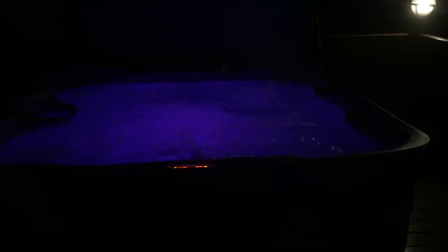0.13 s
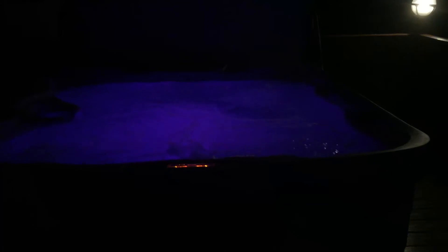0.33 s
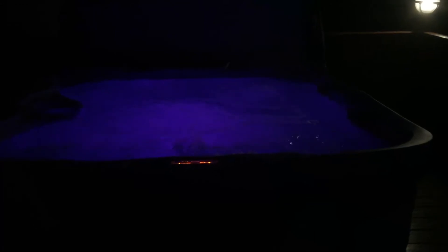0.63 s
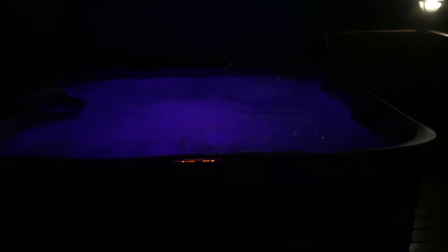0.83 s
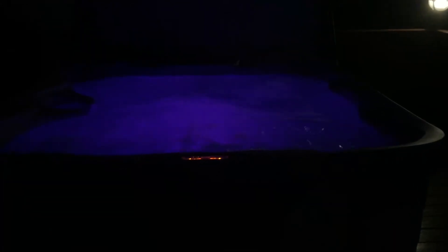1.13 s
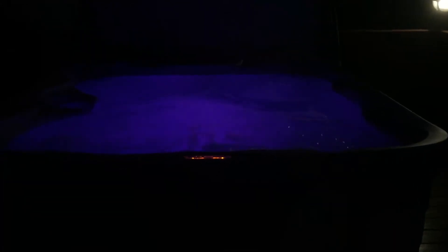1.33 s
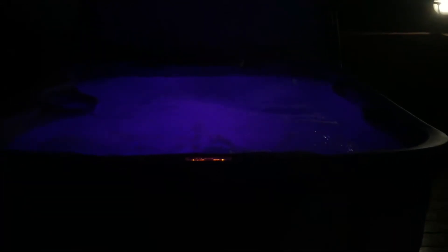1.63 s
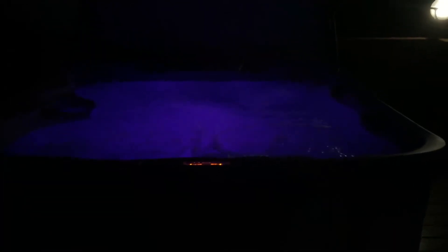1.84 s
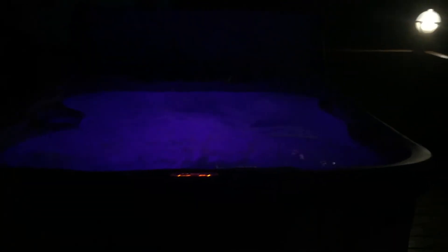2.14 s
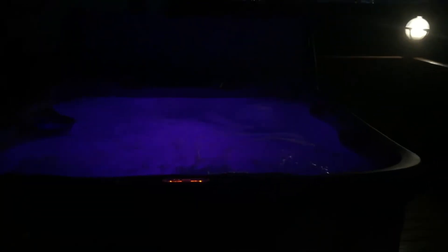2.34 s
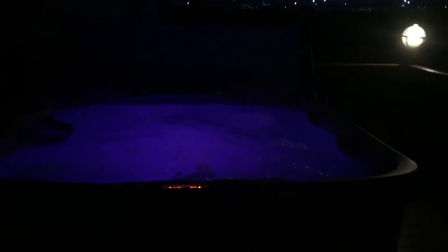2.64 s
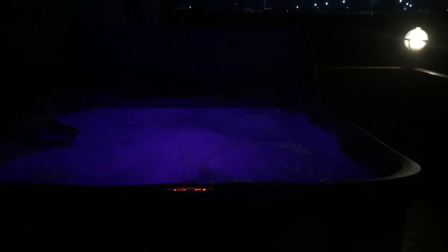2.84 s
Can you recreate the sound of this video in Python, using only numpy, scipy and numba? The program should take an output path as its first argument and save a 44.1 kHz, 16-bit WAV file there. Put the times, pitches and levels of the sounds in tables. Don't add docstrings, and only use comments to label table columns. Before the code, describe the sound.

Hot tub jets rush and bubble steadily over a low pump hum, with small droplet ticks

```python
import sys
import numpy as np
from scipy import signal
from scipy.fft import rfft, irfft
from scipy.io import wavfile
from scipy.ndimage import uniform_filter1d
from numba import njit

SR = 44100
rng = np.random.default_rng(int(sys.argv[2]) if len(sys.argv) > 2 else 0)


def transcribe(u):
    v = np.clip(np.atleast_2d(u).T, -1, 1)
    q = np.round(v * 32767).astype(np.int16)
    wavfile.write(sys.argv[1], SR, q)


def ratio_of_db(decibels):
    return 10 ** (np.asarray(decibels, float) / 20)


N = 132300


def level(x, db):
    return x * ratio_of_db(db) / np.sqrt(np.mean(x ** 2))


@njit
def svf(x, hz, width):
    y, b, l = np.empty(len(x)), 0., 0.
    g, k = np.tan(np.pi * hz / SR), width / hz
    for i in range(len(x)):
        v = (b + g * (x[i] - l)) / (1 + g * (g + k))
        b, l, y[i] = 2 * v - b, l + 2 * g * v, k * v
    return y


@njit
def rings(at, hz, cycles, size, glide):
    y = np.zeros(N)
    for e in range(len(at)):
        start = int(at[e])
        length = cycles[e] * SR / hz[e]
        phase = 0.
        for i in range(min(int(length), N - start)):
            phase += 2 * np.pi * hz[e] * (1 + glide * i / length) / SR
            fade = 7 * i / length
            y[start + i] += size[e] * fade * np.exp(1 - fade) * np.sin(phase)
    return y


def walk(rate):
    hold = int(SR / rate)
    steps = np.repeat(rng.standard_normal(N // hold + 1), hold)
    return 1.28 * uniform_filter1d(uniform_filter1d(steps, hold), hold)[:N]


HUM_HZ = 100.165
# multiple of the hum pitch, rms level in dB.
HUM = [
    (1, -42.5),
    (2, -41.2),
    (3, -40.3),
    (4, -56),
    (5.794, -56),
]
# time in seconds, rms level in dB.
THROB = [(0.13, -56), (0.18, -39), (0.33, -47), (0.37, -54), (0.5, -40.5), (1.04, -43), (1.1, -37.5),
         (1.23, -49.5), (1.38, -34), (1.42, -41), (2.3, -42), (2.38, -44), (2.43, -44.5), (2.56, -42),
         (2.64, -48.5), (2.87, -38), (2.93, -50), (3.0, -49)]


def hum():
    t = np.arange(N) / SR
    throb_db = np.interp(t, *np.array(THROB).T)
    throb_db = throb_db - throb_db.mean()
    out = np.zeros(N)
    for multiple, db in HUM:
        line_db = db + 1.7 * walk(24)
        if multiple == 1:
            line_db = line_db + throb_db
        phase = 2 * np.pi * multiple * HUM_HZ * t + 1.3 * multiple ** 2
        out += np.sqrt(2) * ratio_of_db(line_db) * np.cos(phase)
    return out


# pitch in Hz, width in Hz, rms level in dB.
WHINES = [
    (58, 24, -49),
    (100, 14, -56),
    (339, 7, -52),
    (951, 40, -58),
    (1254, 4, -62.5),
    (2600, 70, -55.5),
    (5900, 500, -62),
]


def whines():
    out = np.zeros(N)
    for hz, width, db in WHINES:
        noise = rng.standard_normal(2 * N)
        tone = svf(noise, 1. * hz, 0.94 * width)
        tone = svf(tone, 1. * hz, 0.94 * width)
        out += level(tone[N:], db)
    return out


# frequency in Hz, strength in dB per Hz.
RUSH = [
    (38, -29),
    (60, -3.5),
    (300, -5),
    (450, -9.5),
    (1250, -17.5),
    (2600, -16),
    (3200, -23),
    (12000, -33),
]
RUSH_DB = -37.5


def rush_db(hz):
    table_hz, table_db = np.array(RUSH).T
    return np.interp(np.log(hz), np.log(table_hz), table_db)


def jets():
    hz = np.maximum(np.arange(N // 2 + 1) * SR / N, 1)
    spectrum = rfft(rng.standard_normal(N)) * ratio_of_db(rush_db(hz))
    swell_db = .2 * walk(0.47) + 0.78 * walk(40.67)
    out = np.zeros(N)
    for octave in np.arange(4, 14.5, 1 / 3):
        distance = np.clip(3 * (np.log2(hz) - octave), -1, 1)
        band = irfft(spectrum * np.cos(np.pi / 2 * distance) ** 2, N)
        out += band * ratio_of_db(swell_db + 1.2 * walk(9.04))
    return level(out, RUSH_DB)


def bursts(count, lo_hz, hi_hz, cycles, spread_db, glide):
    when, pitch, loudness, ring = rng.random((count, 4)).T
    hz = lo_hz * (hi_hz / lo_hz) ** pitch
    size = ratio_of_db(rush_db(hz) - spread_db * np.log(1 - .955 * loudness)) * hz / 1000
    return rings(when * N, hz, cycles * (.5 + ring), size / np.sqrt(cycles), 1. * glide)


def bubbles():
    return ratio_of_db(RUSH_DB + 5.5) * bursts(4500, 299.6, 12820, cycles=30, spread_db=5, glide=.2)


def fizz():
    return ratio_of_db(RUSH_DB + 11.5) * bursts(1500, 3500, 13300, cycles=5, spread_db=2.4, glide=0)


def strike(events):
    s, db, hz, cycles = np.array(events).T.copy()
    return -rings(s * SR, hz, cycles, ratio_of_db(db), 0.022)


# start in seconds, peak in dB, pitch in Hz, cycles of ring.
DROPS = [(.537, -35, 13400, 30), (.748, -36, 11700, 6), (.792, -38, 12400, 14), (1.1035, -35, 5500, 6),
         (1.139, -41, 11000, 40), (1.1775, -38, 7650, 12), (1.283, -36, 8700, 25), (1.381, -40, 11000, 24),
         (1.413, -41, 7900, 14), (1.457, -35, 12400, 10), (1.5, -33, 4500, 4), (1.5395, -34, 3800, 6),
         (1.7045, -35, 13400, 30), (1.7925, -31, 8000, 4), (1.7965, -32, 5000, 6), (1.8015, -35, 9000, 4),
         (2.104, -33, 11000, 5), (2.202, -38, 12400, 20), (2.259, -40, 12000, 4), (2.478, -37, 13800, 10),
         (2.56, -38, 9900, 10), (2.601, -34, 12600, 26), (2.747, -35, 2670, 16), (2.912, -40, 12700, 20),
         (2.939, -32, 4180, 10), (2.939, -38, 5600, 9), (2.8625, -41, 6100, 12), (2.8625, -43, 8400, 12),
         (2.8668, -40, 6600, 12), (2.929, -44, 4600, 12), (2.948, -39, 4300, 16), (1.648, -40, 3630, 20),
         (1.383, -40, 4100, 16), (.224, -40, 8900, 20), (.2255, -42, 10100, 16), (.2965, -37, 3930, 18),
         (0.401, -39, 6450, 18), (.413, -41, 7000, 16), (.468, -41, 10700, 24), (.492, -42, 14300, 16),
         (.52, -43, 14300, 16), (.794, -44, 6800, 14), (1.7945, -41, 13000, 14), (1.938, -43, 4580, 16),
         (2.171, -42, 11750, 20), (2.291, -39, 15000, 20), (2.402, -45, 9200, 16), (2.485, -38.5, 3900, 16),
         (2.916, -40, 7650, 18), (2.837, -41, 12000, 10), (2.936, -38, 12500, 8), (2.824, -42, 8200, 12)]


def droplets():
    return strike(DROPS)


# start in seconds, peak in dB, pitch in Hz, cycles of ring.
GURGLES = [(.445, -40, 2100, 45), (.46, -40, 1850, 50), (.678, -42, 1150, 25), (.88, -38, 1300, 30),
           (.958, -43, 1870, 40), (1.735, -44, 2100, 30), (2.055, -44, 1900, 30), (2.105, -40, 1700, 35),
           (2.395, -39, 1050, 25), (.525, -40, 2300, 25), (1.29, -37, 54, 12), (1.888, -31, 140, 4),
           (2.62, -39, 54, 10), (.388, -43, 1900, 35), (.555, -43, 1270, 28), (1.165, -43, 1180, 26),
           (1.183, -43, 1650, 30), (1.239, -43, 2330, 36), (1.338, -41, 970, 24), (1.697, -40, 715, 20),
           (1.744, -44, 2290, 34), (1.935, -43, 1560, 30), (2.13, -42, 925, 22), (2.277, -42, 2590, 45),
           (2.341, -41, 715, 20), (2.566, -41, 885, 24), (2.597, -42, 1820, 34), (2.654, -40, 760, 20),
           (2.002, -43, 2590, 45), (.748, -43, 2550, 45), (.437, -43, 2550, 45), (.64, -41, 350, 22),
           (2.69, -40, 160, 12)]


def gurgles():
    return strike(GURGLES)


# start in seconds, length in seconds, rms level in dB.
SPLASHES = [(.475, 0.032, -47.5), (.515, .015, -49), (1.132, .01, -59), (1.792, .018, -48),
            (2.102, .012, -48), (2.2, 0.011, -47), (2.47, .015, -53), (2.556, .01, -57),
            (2.724, 0.018, -48), (2.855, 0.014, -49), (2.912, .02, -50)]


def spray():
    t = np.arange(N) / SR
    gate = np.zeros(N)
    for s, length, db in SPLASHES:
        gate += ratio_of_db(db) * np.sin(np.pi * np.clip((t - s) / length, 0, 1))
    crackle = rng.standard_normal(N) * ratio_of_db(3.6 * walk(900))
    return gate * level(svf(crackle, 10300., 15000.), 0)


SNAP_S = 2.8573
# delay in seconds, peak in dB, pitch in Hz, cycles of ring.
SNAP = [
    (.00013, -19.5, 6700, 3),
    (.0002, -24.5, 14000, 5),
    (.0005, -31, 6000, 4),
    (.00043, -29.5, 9300, 14),
]


def snap():
    return strike([(SNAP_S + delay, *rest) for delay, *rest in SNAP])


# frequency in Hz, width in Hz, depth from 0 to 1.
HOLLOWS = [(77, 16, .5), (125, 25, .25), (255, 50, .2), (430, 50, .3), (650, 60, .25), (2400, 80, .25),
           (2700, 90, .4), (3100, 300, .3), (4950, 350, .3), (7600, 900, .33), (10380, 900, .52)]


def hollow(water):
    for hz, width, depth in HOLLOWS:
        water = water - np.clip(depth, 0, 1) * svf(water, 1. * hz, 1. * width)
    return water


def scene():
    water = hollow(jets() + bubbles() + fizz() + spray())
    pump = hum() + whines()
    return (water + pump + droplets() + gurgles() + snap())[None]


# start in seconds, length in seconds, lowest Hz, highest Hz.
GAPS = [(.155, .085, 15450, 16000), (.18, .06, 15200, 15450), (.13, .075, 14820, 15000),
        (.185, .125, 13590, 13770), (.23, .045, 14550, 14950), (.225, .045, 10300, 10450),
        (.295, .06, 10080, 10260), (.25, .035, 12980, 13160), (.275, .06, 15130, 15310)]


def treble_gaps(x):
    hz = np.arange(N // 2 + 1) * SR / N
    t = np.arange(N) / SR
    for s, length, lo_hz, hi_hz in GAPS:
        band = irfft(rfft(x) * ((hz > lo_hz) & (hz < hi_hz)), N)
        x = x - band * np.clip(np.minimum(t - s, s + length - t) / .012, 0, 1)
    return x


def top_cut(x):
    return signal.sosfilt(signal.butter(12, 16510, fs=SR, output="sos"), x)


def record(dry):
    x = signal.sosfilt(signal.butter(6, 44.2, "high", fs=SR, output="sos"), dry)
    x = signal.sosfilt(signal.butter(3, 13240, fs=SR, output="sos"), x)
    hz = np.arange(N // 2 + 1) * SR / N
    t = np.arange(N) / SR
    top = x - irfft(rfft(x) * np.clip((15720 + 60 - hz) / 60, .02, 1), N)
    x = x - top * np.clip(np.abs(t - SNAP_S) / .0013 - 1, 0, 1)
    x = treble_gaps(x)
    x = x * np.clip((t - .1203) / 0.000091, 0, 1)
    return top_cut(x)


dry = scene()
out = record(dry)
transcribe(out)
```